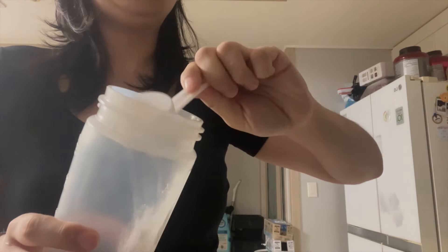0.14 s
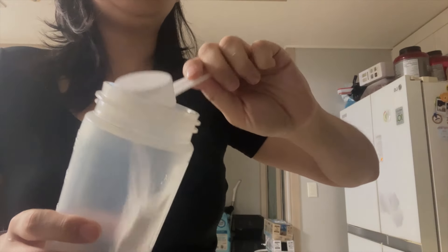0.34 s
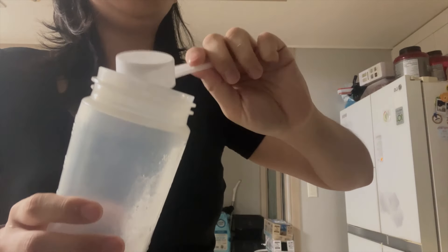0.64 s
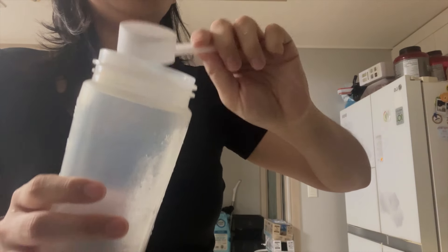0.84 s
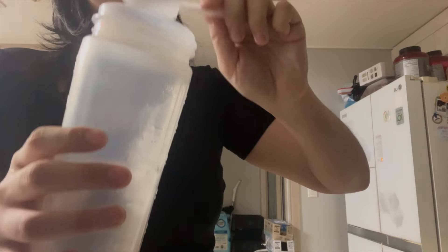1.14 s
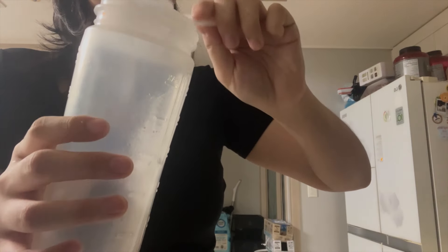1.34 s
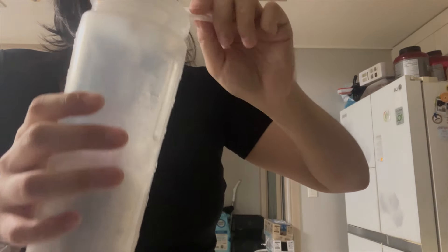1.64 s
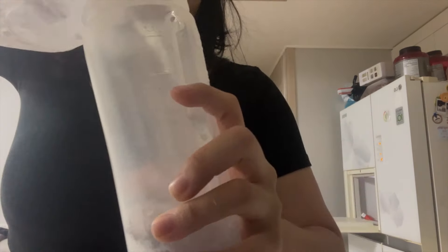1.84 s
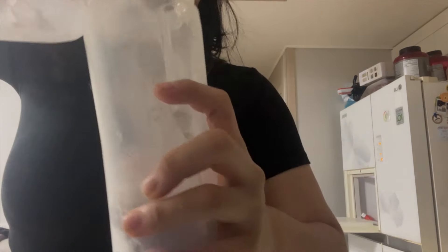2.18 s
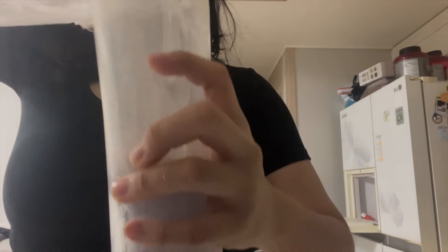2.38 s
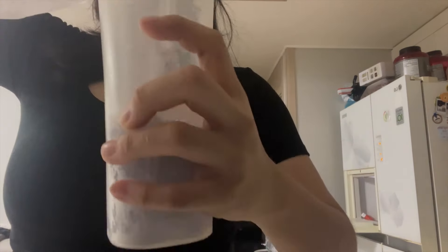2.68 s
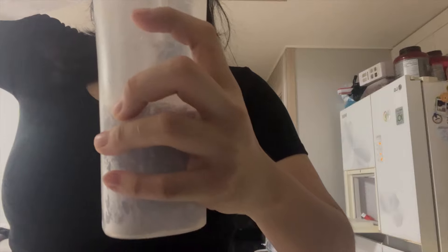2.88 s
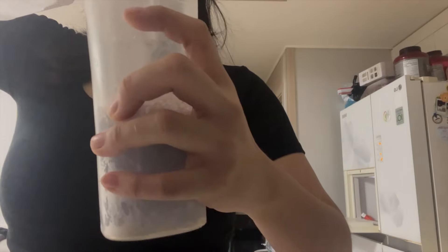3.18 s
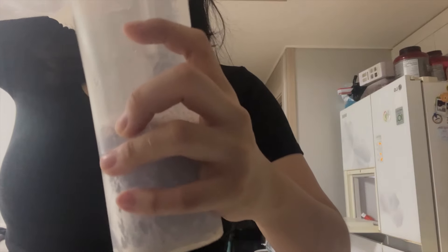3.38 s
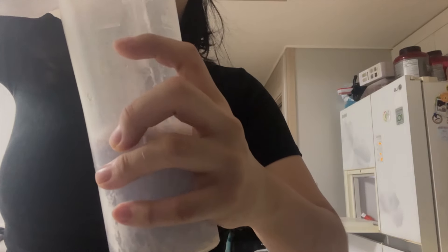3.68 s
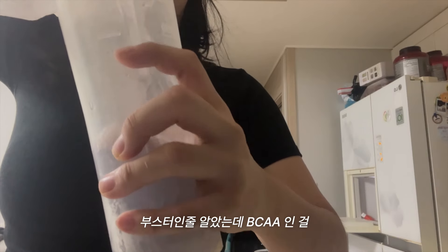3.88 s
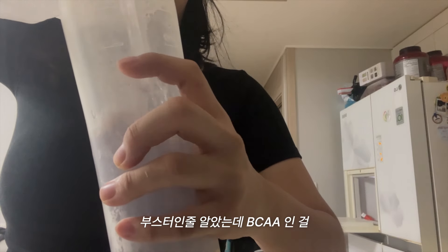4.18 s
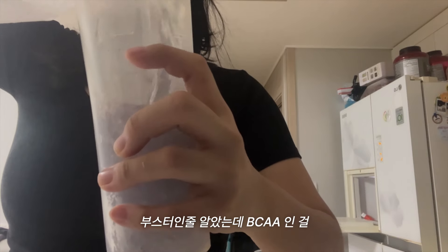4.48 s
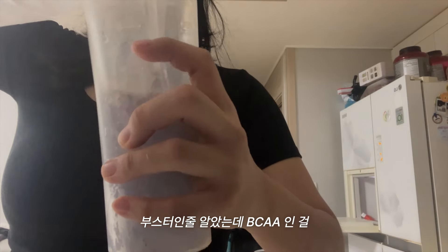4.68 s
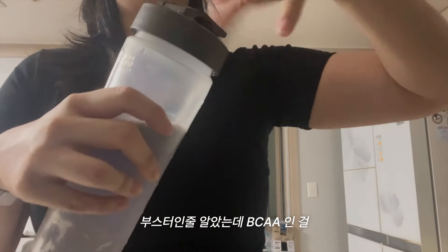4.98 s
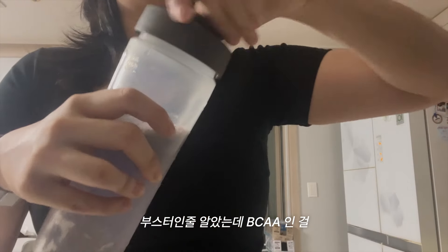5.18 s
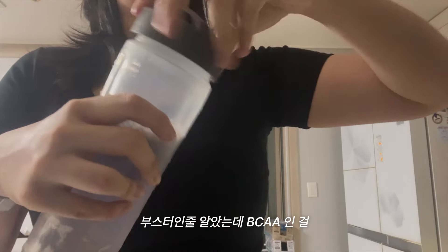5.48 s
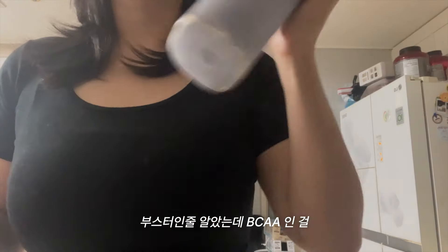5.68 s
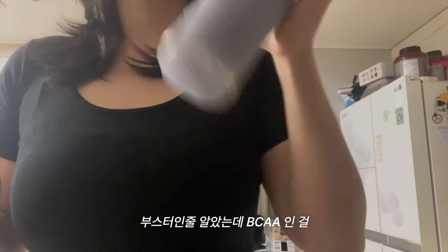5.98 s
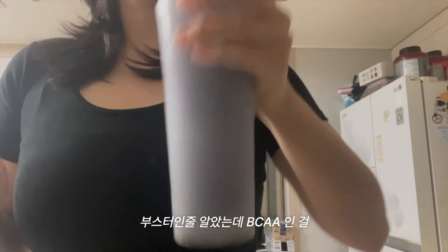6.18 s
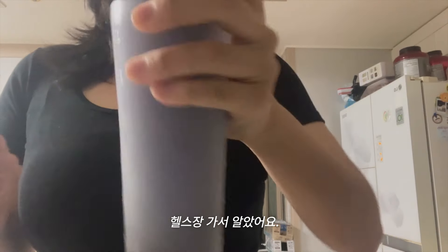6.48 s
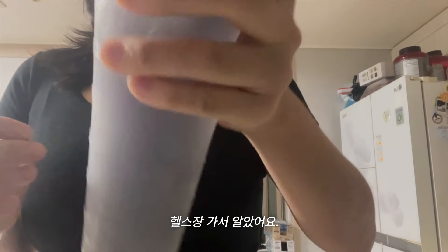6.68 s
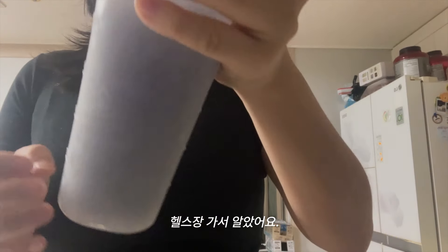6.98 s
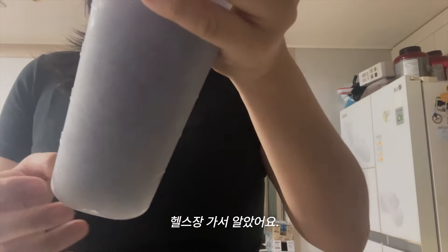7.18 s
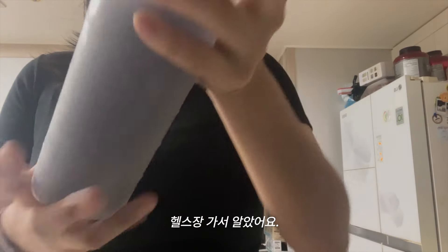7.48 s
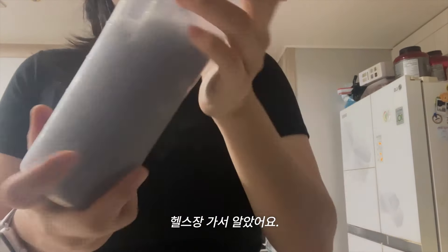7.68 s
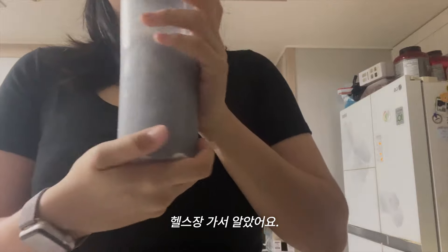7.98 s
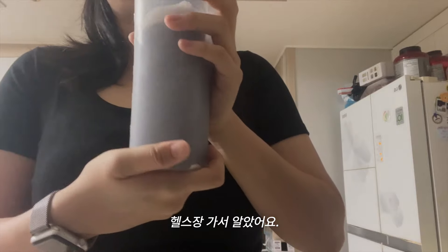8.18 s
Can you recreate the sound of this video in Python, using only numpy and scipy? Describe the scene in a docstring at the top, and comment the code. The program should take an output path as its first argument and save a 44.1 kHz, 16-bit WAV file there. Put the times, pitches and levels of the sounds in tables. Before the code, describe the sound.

In a small kitchen with a faint refrigerator hum, a plastic scoop raps a hollow bottle rim three times. Water glugs from a jug in two splashy bursts, the bottle's airy tone rising as it fills. A lid rattles on, followed by about a second of quick, frothy shaking, last drips and soft palm rubs. Close stereo microphone, short room reverberation.

```python
"""Shaker bottle, water and lid

A plastic scoop taps the rim of a shaker bottle in a kitchen; a jug that gulps air pours water in twice.
Struck bodies are damped sines, water is bubble tones and flickering spray; pipe tones rise as it fills.
The lid knocks on its thread, the bottle is shaken, a palm slides on its wall; a refrigerator hums.
Near sounds reach two ports a few cm apart, directly and through noise tails of the room."""
import sys
import numpy as np
from scipy import signal
from scipy.fft import rfft, irfft, next_fast_len
from scipy.io import wavfile
from scipy.ndimage import uniform_filter1d

SR = 44100
rng = np.random.default_rng(int(sys.argv[2]) if len(sys.argv) > 2 else 0)


def dump_mix(stems):
    """Bounce the given channels to the path in sys.argv[1] as a 16-bit WAV at rate SR."""
    frames = np.atleast_2d(stems).T  # one column per channel
    limited = np.clip(frames, -1, 1)  # hard clip at full scale
    pcm = np.round(limited * 32767).astype(np.int16)
    wavfile.write(sys.argv[1], SR, pcm)


N = 367794
T = np.arange(N) / SR
HZ = np.maximum(np.arange(N // 2 + 1) * SR / N, 1)


def amp(db):
    """Gain of a level in dB."""
    return 10 ** (np.asarray(db) / 20)


def rms_one(x):
    """Scales to rms 1."""
    return x / np.sqrt(np.mean(x ** 2) + 1e-20)


def at_hz(points, hz):
    """Reads a table on a log-frequency axis."""
    table_hz, values = np.transpose(points)
    return np.interp(np.log(hz), np.log(table_hz), values)


def gain_curve(tables):
    """Sums gains of (t/s, level/dB) curves; silent outside them."""
    return sum(amp(np.interp(T, *np.transpose(rows), -150, -150)) for rows in tables)


def noise(spectrum):
    """Shapes white noise to a spectrum, rms 1."""
    white = rfft(rng.standard_normal(N))
    return rms_one(irfft(white * amp(at_hz(spectrum, HZ)), N))


def drift(rate_hz):
    """Low-passes noise by a double pole into a slow wander of rms 1, drawn every 16th sample."""
    r = np.exp(-32 * np.pi * rate_hz / SR)
    draws = rng.standard_normal(N // 16 + 3002)
    slow = signal.lfilter([1], [1, -2 * r, r * r], draws)[3000:]  # settled part
    return np.interp(np.arange(N) / 16, np.arange(len(slow)), rms_one(slow))


def split(x, hz):
    """Splits into the parts below and above a frequency."""
    low = signal.sosfilt(signal.butter(4, hz, fs=SR, output="sos"), x)
    high = signal.sosfilt(signal.butter(4, hz, "high", fs=SR, output="sos"), x)
    return low, high


def resonate(x, hz, t60_s):
    """Drives one damped resonance."""
    r, w = amp(-60 / (t60_s * SR)), 2 * np.pi * hz / SR
    return signal.lfilter([0, np.sin(w)], [1, -2 * r * np.cos(w), r * r], x + 1e-18)


def add(out, s, hz, db, t60_s, contact_s, glide=0.):
    """Adds a tone that swells during contact, decays, and glides up if asked."""
    i = round(s * SR)
    t = T[:min(int(t60_s * SR), N - i)]
    swelling = np.sin(np.pi / 2 * np.minimum(t / contact_s, 1)) ** 2
    tone = np.sin(2 * np.pi * hz * t * (1 + glide * t / t60_s))
    out[i:i + len(t)] += amp(db - 60 * t / t60_s) * swelling * tone


def strike(out, s, db, modes, contact_s, uneven_db):
    """Rings every mode of a body by one blow, each with a random strength."""
    for (hz, mode_db, t60_s), u in zip(modes, rng.standard_normal(len(modes))):
        add(out, s, hz, db + mode_db + uneven_db * u, t60_s, contact_s)
    return out


def bursts(times_s, levels_db, t60_s, rise_s):
    """Envelope of puffs: clicks smoothed by a fast rise and an exponential decay."""
    clicks = np.zeros(N)
    clicks[np.round(np.asarray(times_s) * SR).astype(int)] = amp(levels_db)
    smooth = np.exp(-1 / (rise_s * SR))
    poles = np.convolve([1, -amp(-60 / (t60_s * SR))], [1, -smooth])
    return signal.lfilter([1 - smooth], poles, clicks + 1e-18)


def swell(s, db, hold_s, rise_s, fall_db_per_s):
    """Gain that reaches its level at s, holds, then falls steadily in dB."""
    rise = np.clip((T - s) / rise_s + 1, 0, 1) ** 2
    return rise * amp(db - fall_db_per_s * np.maximum(T - s - hold_s, 0))


def grains(per_s, spread_db):
    """Random clicks of uneven size and either sign."""
    present = rng.random(N) < per_s / SR
    size = amp(spread_db * np.minimum(rng.exponential(1, N), 4))
    return present * size * rng.choice([-1, 1], N)


def bubbles(when, per_s, spread_db, centre_hz, octaves, cycles):
    """Random clicks ring short bubble tones scattered round a centre pitch; level evened."""
    clicks = grains(per_s, spread_db)[when]
    dealt = rng.integers(0, 14, N)[when]
    out = np.zeros(N)
    for k, away in enumerate(np.linspace(-1.6, 1.6, 14)):
        hz = min(centre_hz * 2 ** (away * octaves), .4 * SR)
        weight = np.exp(-.5 * away ** 2)
        out[when] += weight * resonate(clicks * (dealt == k), hz, cycles / hz)
    power = np.abs(uniform_filter1d(out ** 2, SR // 4))
    return out / np.sqrt(power + 1e-6)


# kitchen noise spectrum: f/Hz, relative level/dB
ROOM_TONE_SPECTRUM = [(25, -25), (45, -4.5), (75, -2), (150, -8), (300, -14.5), (480, -14.5), (680, -13.5),
                      (850, -26), (1500, -32.5), (2200, -44.5), (4000, -47.5), (8000, -48.5),
                      (16000, -52.5)]
# kitchen noise at the two ports: f/Hz, left-right correlation/1
PORT_LIKENESS = [(60, .9), (300, 0.42), (3000, 0.067)]
# refrigerator resonances: f/Hz, inverse t60/(1/s), level before port gain/dB
FRIDGE_HUM = [(229.1, 2.8, -59.5), (481, 27, -67)]
FLOOR_DB = -56  # before port gain


def kitchen_noise():
    """Steady rumble and hum, earlier and louder at right; the rumble is most alike in the bass."""
    alike = np.clip(at_hz(PORT_LIKENESS, HZ), -1, 1)
    mid, side = rfft(rng.standard_normal((2, N))) * amp(at_hz(ROOM_TONE_SPECTRUM, HZ))
    ports = np.sqrt(1 + alike) * mid + np.sqrt(1 - alike) * side * [[1], [-1]]
    tone = rms_one(irfft(ports, N))
    hum = np.zeros(N)
    for hz, inverse_t60, db in FRIDGE_HUM:
        hum += amp(db) * rms_one(resonate(rng.standard_normal(N), hz, 1 / inverse_t60))
    left, right = amp(FLOOR_DB) * tone + hum
    return np.array([amp(-0.86) * np.roll(left, round(0.0006 * SR)), amp(1.0) * right])


# near sounds, phase by which left leads: f/Hz, lead/rad
LEFT_LEAD = [(0, 0.28), (700, 0.49), (2000, 0.82), (2900, -2), (4300, -2), (5500, -2.5), (6500, 0.07),
             (7900, 1.5), (9300, 1.6), (12000, 1.5)]
# near sounds, level difference: f/Hz, left-right level/dB
LEFT_BALANCE = [(100, -0.5), (250, 1.5), (600, 4.5), (1290, -9), (2300, 3.5), (4400, -4.5), (8000, -0.5)]
# part that wanders at each port as the bottle moves: f/Hz, level/dB
WANDERING_PART = [(500, -25), (1000, -14), (1700, -6), (3000, -3.5), (5500, 1), (7500, -19.5)]
# reverberation by octave: f/Hz, relative level/dB, t60/s
ROOM_DECAY = [(134, -22, 0.97), (234, -9.5, 0.13), (514, -11, 0.21), (940, -18.5, 0.28),
              (2027, -13.5, 0.27), (3487, -13.5, 0.23), (7744, -15.5, 0.23), (13240, -19, 0.3)]
TAIL_DB, TAIL_RISE_S, PLACE_HZ = -22.0, 0.0064, 1.3


def heard(near):
    """Direct sound at two ports, partly wandering, plus the room as noise decaying band by band."""
    size, t = next_fast_len(N + SR), T[:SR // 2]
    hz = np.maximum(np.arange(size // 2 + 1) * SR / size, 1)
    half_phase = np.exp(.5j * np.interp(hz, *np.transpose(LEFT_LEAD)))
    half = amp(at_hz(LEFT_BALANCE, hz) / 2) * half_phase
    tail = np.zeros((2, 2, len(t)))  # bottle places, ports
    for centre_hz, db, t60_s in ROOM_DECAY:
        edges_hz = centre_hz * 2 ** np.array([-.5, .5])
        octave = signal.butter(2, edges_hz, "band", fs=SR, output="sos")
        band = signal.sosfilt(octave, rng.standard_normal(tail.shape))
        decay = amp(db + TAIL_DB - 60 * t / t60_s)
        tail += band * decay * np.minimum(t / TAIL_RISE_S, 1) ** 2
    place = 2 * np.pi * PLACE_HZ * T
    wander = [np.cos(2 * drift(4.4)), np.cos(2 * drift(3.6))]
    gains = np.array([np.cos(place), np.sin(place), *wander])
    here, there, *shifted = rfft(near * gains, size)
    first, second = rfft(tail, size)
    direct = rfft(near, size) * np.array([half, 1 / half])
    direct = direct + amp(at_hz(WANDERING_PART, hz)) * np.array(shifted)
    return irfft(direct + here * first + there * second, size)[:, :N]


# scoop in powder, lid turning, palm on the wall: t/s, level/dB, hold/s, rise/s
RUB_STROKES = [(0.004, -70.5, 0.19, 0.024), (5.058, -50, 0.13, 0.014), (5.238, -62, 0.0084, 0.0056),
               (5.52, -52, 0.012, 0.12), (7.422, -65, .005, 0.0044), (7.611, -51, 0.061, 0.072),
               (7.801, -52.5, 0.076, 0.2)]
# friction spectrum: f/Hz, relative level/dB
RUB_SPECTRUM = [(300, -33.5), (900, 0.5), (2200, 0.5), (3200, -1.5), (6500, 2), (9500, 4.5), (13000, 2),
                (16000, 2.5)]
RUB_FALL_DB_PER_S = 265


def rubbing():
    """Friction as shaped noise with a slight level drift."""
    envelope = sum(swell(*row, RUB_FALL_DB_PER_S) for row in RUB_STROKES)
    return envelope * noise(RUB_SPECTRUM) * amp(0.95 * drift(23))


# scoop on rim, with bounces: t/s, tone level/dB, crack level/dB
RIM_TAPS = [(1.2421, -6, -10), (1.2629, -16.5, -18.5), (1.4532, -10, -22), (1.472, -20.5, -20.5),
            (1.6339, -8, -11.5), (1.6446, -24.5, -42)]
# empty bottle modes: f/Hz, level re tap/dB, t60/s
BOTTLE_MODES = [(346, -16, 0.11), (524, -12.5, .03), (720, -14.5, 0.038), (1100, -8.5, 0.037),
                (1217, 4, 0.016), (1400, -5, 0.0062), (1504, -2.5, 0.024), (2092, -13, 0.014),
                (2820, -12, 0.014)]
# broad crack, also used by lid and water: f/Hz, relative level/dB
CRACK_SPECTRUM = [(150, -41.5), (500, -3.5), (1300, -6), (2500, -17), (4500, -19), (8000, -25.5),
                  (16000, -40.5)]


def taps():
    """Each tap rings the empty bottle's modes and cracks as a burst of high noise."""
    out = np.zeros(N)
    for s, db, _ in RIM_TAPS:
        out = strike(out, s, db, BOTTLE_MODES, contact_s=.0022, uneven_db=1)
    s, _, crack_db = np.transpose(RIM_TAPS)
    _, high = split(noise(CRACK_SPECTRUM), 2000)
    return out + high * bursts(s, crack_db, t60_s=0.0085, rise_s=0.00089)


# lid knocking on its thread: t/s, tone level/dB, thud level/dB, crack level/dB
LID_KNOCKS = [(5.06, -10, -16, -20.5), (5.083, -29, -23.5, -53), (5.099, -11, -15.5, -21),
              (5.138, -35, -26, -49), (5.161, -27, -34, -31), (5.164, -20, -19, -22),
              (5.178, -29, -25.5, -50), (5.432, -47, -25.5, -64), (5.445, -24, -45, -43),
              (5.462, -27, -20.5, -38.5), (5.507, -22.5, -30, -39), (5.527, -16.5, -44, -33)]
# lid and full bottle modes: f/Hz, level re knock/dB, t60/s
CAP_MODES = [(600, 3.5, 0.012), (1040, 1, 0.016), (1400, -3.5, 0.011), (1997, -10, 0.0091),
             (3570, -23.5, 0.02), (4320, -33, 0.014)]
# full bottle thud modes, also used by shaking: f/Hz, level re thud/dB, t60/s
THUD_MODES = [(144, 0.5, 0.038), (211.8, 0.57, 0.051), (300.5, -0.5, 0.051)]


def lid():
    """Each catch of the thread rings the cap, thuds the full bottle and cracks."""
    out = np.zeros(N)
    for s, db, thud_db, _ in LID_KNOCKS:
        out = strike(out, s, db, CAP_MODES, contact_s=0.001, uneven_db=2.5)
        out = strike(out, s, thud_db, THUD_MODES, contact_s=0.006, uneven_db=1)
    s, crack_db = np.array(LID_KNOCKS)[:, [0, 3]].T
    return out + noise(CRACK_SPECTRUM) * bursts(s, crack_db, t60_s=0.029, rise_s=0.00075)


# fine drops: f/Hz, relative level/dB
SPRAY_SPECTRUM = [(1500, 6.5), (2500, 3), (3300, 1.5), (4500, 4), (7300, -5), (8900, -4), (13000, -6.5),
                  (16000, -17)]


def spray(when, flicker_db, grain_share):
    """Hiss of fine drops: noise and tiny pops in four bands that flicker partly apart."""
    pops = bubbles(when, 1200, 6.5, 5600, octaves=0.8, cycles=21.0)
    rest = (noise(SPRAY_SPECTRUM) + grain_share * pops)[when]
    out, together = np.zeros(N), drift(28)
    for edge_hz in (2900, 5000, 8200, 19000):
        band, rest = split(rest, edge_hz)
        flicker = together + 2.4 * drift(45)
        out[when] += band * amp(flicker_db * flicker[when])
    return out / out[when].std()


# water hitting cap or base: t/s, level/dB, f/Hz
WATER_KNOCKS = [(5.683, -22.5, 870), (5.705, -21.5, 1720), (5.746, -12.5, 1265), (5.794, -27, 644),
                (5.838, -11, 910), (5.871, -18, 730), (6.023, -28, 666), (6.106, -22, 1430),
                (6.149, -26, 758), (6.498, -21, 703), (6.37, -22, 569), (6.434, -23.5, 675),
                (6.621, -28, 1380), (6.635, -26, 1350), (6.681, -28.5, 990), (6.705, -26.5, 1180),
                (6.731, -29.5, 896)]
# last drips from the cap: t/s, level/dB, f/Hz, splash level/dB
CAP_DRIPS = [(6.772, -47, 1290, -67), (6.816, -37.5, 1450, -41.5), (6.838, -35, 600, -62),
             (6.879, -39, 1400, -45.5), (6.95, -45, 1090, -48), (7.028, -46, 1450, -70),
             (7.05, -51, 1400, -74)]
# single pops of the froth: t/s, level/dB, f/Hz
FROTH_POPS = [(6.121, -40, 6000), (6.281, -21.5, 6540), (6.579, -36, 4500), (6.635, -32, 5300),
              (6.68, -26, 3620), (6.708, -28, 2350), (6.774, -41, 5850)]
HIT_SMACK_DB, HIT_MIST_DB = -9.5, -23  # re hit tone


def hits_and_drips(mist):
    """Hits, drips and pops are short tones; hits add noise smacks, hits and drips puffs of mist."""
    out = np.zeros(N)
    for s, db, hz, *_ in WATER_KNOCKS + CAP_DRIPS:
        add(out, s, hz, db, t60_s=16 / hz, contact_s=.0006, glide=0.11)
    for s, db, hz in FROTH_POPS:
        add(out, s, hz, db, t60_s=25 / hz, contact_s=.0004)
    s, db, _ = np.transpose(WATER_KNOCKS)
    out += noise(CRACK_SPECTRUM) * bursts(s, db + HIT_SMACK_DB, t60_s=0.016, rise_s=0.003)
    puffs = bursts(s, db + HIT_MIST_DB, t60_s=0.0058, rise_s=0.00088)
    drip_s, splash_db = np.array(CAP_DRIPS)[:, [0, 3]].T
    return out + mist * (puffs + bursts(drip_s, splash_db, t60_s=0.022, rise_s=0.0022))


# water thrown to base and back to cap: t/s, froth level/dB, hold/s, bright splash level/dB
SHAKE_STROKES = [(5.685, -40.5, 0.23, -47.5), (5.835, -34.5, 0.035, -47), (6.014, -40, 0.091, -48.5),
                 (6.147, -28.5, 0.046, -41.5), (6.338, -36.5, 0.055, -37.5), (6.453, -44, 0.018, -70),
                 (6.496, -33, 0.016, -38.5), (6.544, -49.5, 0.093, -56.5)]
# churning water, also used by pouring: f/Hz, relative level/dB
RUMBLE_SPECTRUM = [(30, 0), (55, 2.5), (120, -5), (260, -11), (400, -30.5)]
SHAKING = slice(int(5.6 * SR), int(7.3 * SR))
STROKE_RISE_S, STROKE_FALL_DB_PER_S = .008, 260
STROKE_THUD_DB, SHAKE_RUMBLE_DB = 0, -25  # re froth
CLUMP_DB = 2.5  # rms level wander of the froth
STILL_S, STILL_FALL_DB_PER_S = 6.73, 397  # hand stops, hiss collapses
MIST_DB, MIST_FALL_DB_PER_S = -44.5, 91  # at a stroke of mean level
MIST_FOLLOWS = 0.39  # dB of mist per dB of froth
MIST_FLICKER_DB = .8  # per unit of drift
FOAM_S, FOAM_DB, FOAM_RISE_S, FOAM_FALL_DB_PER_S = 6.58, -49, 0.067, 66  # settling froth crackles


def shaking():
    """Thrown water froths as bubbles, rumble and hiss, thuds as it lands, then foam crackles."""
    mean_db = np.mean(SHAKE_STROKES, axis=0)[1]
    froth, bright, hiss = np.zeros((3, N))
    for s, froth_db, hold_s, bright_db in SHAKE_STROKES:
        froth += swell(s, froth_db, hold_s, STROKE_RISE_S, STROKE_FALL_DB_PER_S)
        bright += swell(s, bright_db, hold_s, STROKE_RISE_S, STROKE_FALL_DB_PER_S)
        mist_db = MIST_DB + MIST_FOLLOWS * (froth_db - mean_db)
        hiss += swell(s, mist_db, hold_s, STROKE_RISE_S, MIST_FALL_DB_PER_S)
    hiss *= amp(-STILL_FALL_DB_PER_S * np.maximum(T - STILL_S, 0))
    churn = bubbles(SHAKING, 550, 3.5, 964, octaves=0.585, cycles=26.5)
    churn += amp(SHAKE_RUMBLE_DB) * noise(RUMBLE_SPECTRUM)
    out = froth * churn + bright * bubbles(SHAKING, 700, 4.0, 1836, octaves=0.51, cycles=21)
    out *= amp(CLUMP_DB * drift(30))
    foam = swell(FOAM_S, FOAM_DB, 0, FOAM_RISE_S, FOAM_FALL_DB_PER_S)
    out += foam * bubbles(SHAKING, 230, 6.5, 4800, octaves=0.6, cycles=16)
    for s, db, _, _ in SHAKE_STROKES:
        out = strike(out, s, db + STROKE_THUD_DB, THUD_MODES, contact_s=.012, uneven_db=3)
    mist = spray(SHAKING, MIST_FLICKER_DB, 0.4)
    return out + mist * (hiss + amp(-2.0) * foam) + hits_and_drips(mist)


# air gulped by the jug: t/s, level/dB, start f/Hz, t60/s
JUG_GULPS = [(1.815, -12, 260.5, 0.1), (1.854, -16, 277, 0.071), (1.945, -10, 270, 0.066),
             (1.996, -19, 315, 0.0605), (2.085, -10, 270, .11), (2.139, -9.5, 293, 0.052),
             (2.167, -8.5, 336, 0.034), (3.895, -12, 268, 0.1), (3.944, -10, 315, 0.044),
             (4.033, -11.5, 280, 0.073), (4.1, -12.5, 330, 0.036), (4.111, -14, 243, 0.033)]
# jug wall flexing as air enters: t/s, level/dB, f/Hz
JUG_FLEXES = [(1.822, -30.5, 93.3), (1.886, -28, 102), (1.946, -30, 86), (2.031, -26.5, 111.3),
              (2.14, -33, 107), (2.245, -39, 69.6), (3.908, -27.5, 78.6), (4.02, -30.5, 91.6),
              (4.112, -26.5, 77.5), (4.209, -30, 113.7), (4.337, -25.5, 77.2), (4.439, -32, 78.5)]


def jug():
    """Gulped air sounds as tones gliding up; the flexing wall as low steady-pitched tones."""
    out = np.zeros(N)
    for s, db, hz, t60_s in JUG_GULPS:
        add(out, s, hz, db, t60_s, contact_s=.004, glide=0.017)
    for s, db, hz in JUG_FLEXES:
        add(out, s, hz, db, t60_s=.4, contact_s=.012)
    return out


# water slapping into the bottle: t/s, slap level/dB, slap start f/Hz, pipe drive level/dB
WATER_SLAPS = [(1.817, -29.5, 890, -22.5), (1.861, -22.5, 1040, -30), (1.876, -17, 1252, -30.5),
               (1.897, -26.5, 1298, -29.5), (2.03, -15, 1430, -24), (2.056, -47.5, 1403, -19.5),
               (2.087, -28, 1040, -22.5), (2.145, -40, 948, -17.5), (2.175, -31, 1440, -19),
               (2.251, -34.5, 970, -20), (2.267, -17.5, 846, -28.5), (2.288, -18.5, 1385, -27),
               (2.318, -26.5, 1440, -33.5), (2.341, -29.5, 1435, -46), (2.468, -23.5, 1354, -31.5),
               (2.616, -38.5, 1536, -58.5), (2.662, -34, 1486, -63), (2.693, -20, 1504, -44.5),
               (2.726, -25, 1460, -37), (2.735, -30, 1520, -43), (2.784, -31.5, 1520, -44.5),
               (3.67, -34.5, 1534, -48), (3.732, -23, 620, -29.5), (3.82, -37, 1500, -43.5),
               (3.942, -29, 1650, -29), (4.079, -21, 803, -21), (4.139, -26.5, 1230, -46),
               (4.176, -28.5, 1680, -41.5), (4.197, -29, 1590, -47), (4.229, -14, 1740, -17.5),
               (4.289, -33, 1650, -28), (4.361, -28.5, 1660, -34), (4.407, -16.5, 1870, -21),
               (4.474, -22.5, 1630, -32.5), (4.513, -24, 1530, -40), (4.632, -30.5, 1466, -41.5),
               (4.655, -29.5, 1024, -34), (4.71, -32, 987, -37), (4.737, -23, 1080, -22),
               (4.789, -27, 1550, -33.5), (4.812, -28, 950, -55)]
SMACK_DB = -10.5  # re slap tone


def slaps():
    """Each slap is a short tone gliding up with a broad smack."""
    out = np.zeros(N)
    for s, db, hz, _ in WATER_SLAPS:
        add(out, s, hz, db, t60_s=18 / hz, contact_s=.0006, glide=0.027)
    s, db, _, _ = np.transpose(WATER_SLAPS)
    return out + noise(CRACK_SPECTRUM) * bursts(s, db + SMACK_DB, t60_s=0.027, rise_s=0.0028)


# air over the rising water: t/s, lowest pipe tone before wobble f/Hz
AIR_PITCH = [(1.8, 440.3), (2.3, 481), (3.701, 487.4), (4.8, 593.7)]
# tube shut at one end: multiple of lowest tone/1, relative level/dB, t60/s
PIPE_MODES = [(1, 3.5, 0.076), (3.051, -13, 0.043)]
PIPE_RING_DB = -34.5  # drive by drops, re burble
AIR_WOBBLE = .024  # rms share of pitch; the surface heaves


def air_column(flow):
    """Slaps and drops drive decaying pipe tones whose pitch rises and wavers."""
    s, _, _, pipe_db = np.transpose(WATER_SLAPS)
    drive, out = np.zeros((2, N))
    drive[np.round(s * SR).astype(int)] = amp(pipe_db)
    drive += amp(PIPE_RING_DB) * flow * rms_one(grains(140, 15.0))
    hz = np.interp(T, *np.transpose(AIR_PITCH)) * (1 + AIR_WOBBLE * drift(17))
    phase = 2 * np.pi * np.cumsum(hz) / SR
    for multiple, mode_db, t60_s in PIPE_MODES:
        turn = np.exp(1j * multiple * phase)
        # decay in a frame that turns with the moving pitch
        ringing = signal.lfilter([1], [1, -amp(-60 / (t60_s * SR))], drive / turn + 1e-18)
        out += amp(mode_db) * (ringing * turn).imag
    return out


# loudest drops bursting: t/s, spray level below 8 kHz/dB, spray level above 8 kHz/dB
DROP_BURSTS = [(1.811, -42.5, -32.5), (1.87, -42.5, -37), (1.8992, -31.5, -22.5), (1.9413, -30.5, -15),
               (2.0379, -39, -18.5), (2.061, -35.5, -25.5), (2.092, -41, -31.5), (2.1238, -31.5, -26),
               (2.1894, -32, -37), (2.2948, -27.5, -19.5), (2.386, -49, -30), (2.4509, -38.5, -49.5),
               (2.4819, -24.5, -20.5), (2.6589, -50, -21.5), (2.6898, -51, -31), (2.7322, -36, -67.5),
               (3.6686, -59, -38.5), (3.722, -47.5, -43), (3.943, -35, -64), (3.991, -67.5, -38.5),
               (4.0785, -38, -24), (4.2172, -34, -43), (4.227, -24.5, -23.5), (4.29, -31.5, -27),
               (4.378, -67, -28.5), (4.4041, -20, -20.5), (4.4898, -30.5, -20.5), (4.63, -32.5, -36.5),
               (4.735, -53, -33.5)]


def bursting_drops(hiss):
    """Puffs of spray, with separate envelopes below and above 8 kHz."""
    s, low_db, high_db = np.transpose(DROP_BURSTS)
    low, high = split(hiss, 8000)
    out = low * bursts(s, low_db, t60_s=0.039, rise_s=0.0024)
    return out + high * bursts(s, high_db, t60_s=0.05, rise_s=0.0012)


# flow, one curve per pour: t/s, burble level/dB
POUR_FLOWS = [
    [(1.81, -38), (2.2, -33.5), (2.26, -48.5), (2.48, -43), (2.62, -66.5), (2.74, -44), (2.84, -83)],
    [(3.66, -95), (3.72, -50), (3.9, -50), (4.1, -41.5), (4.5, -52), (4.6, -50), (4.82, -50), (4.9, -64)],
]
POURING = slice(int(1.7 * SR), 5 * SR)
STREAM_FLICKER_DB = 1.8  # per unit of drift
STREAM_SPRAY_DB, BLIPS_DB, RUMBLE_DB = -12, -10, -7.5  # re burble


def pouring():
    """Jug, slaps, air column and bursting drops over a stream of bubbles, spray and rumble."""
    flow = gain_curve(POUR_FLOWS)
    hiss = spray(POURING, STREAM_FLICKER_DB, 1.05)
    stream = bubbles(POURING, 340, 7.4, 750, octaves=0.75, cycles=20)
    stream += amp(BLIPS_DB) * bubbles(POURING, 170, 6.3, 1560, octaves=0.29, cycles=87)
    stream += amp(STREAM_SPRAY_DB) * hiss
    stream += amp(RUMBLE_DB + 9.5 * drift(7.8)) * noise(RUMBLE_SPECTRUM)
    return jug() + slaps() + air_column(flow) + bursting_drops(hiss) + flow * stream


def scene():
    """Near sounds through the room, over the kitchen noise."""
    near = rubbing() + taps() + lid() + shaking() + pouring()
    return kitchen_noise() + heard(near)


# overall treble response: f/Hz, gain/dB
TREBLE_RESPONSE = [(9300, -3), (10200, -15), (10500, -29), (11200, -23), (11700, -13), (12500, -5),
                   (15000, -6.5), (16200, -16.5)]
BASS_CUT_HZ, STOPBAND_HZ = 42, 16900


def record(dry):
    """The sound lacks deep bass, dips near 10.5 kHz and ends below 17 kHz."""
    coloured = irfft(rfft(dry) * amp(at_hz(TREBLE_RESPONSE, HZ)), N)
    coloured = signal.sosfilt(signal.butter(3, BASS_CUT_HZ, "high", fs=SR, output="sos"), coloured)
    return signal.sosfilt(signal.cheby2(12, 70, STOPBAND_HZ, fs=SR, output="sos"), coloured)


dry = scene()
out = record(dry)
dump_mix(out)
```